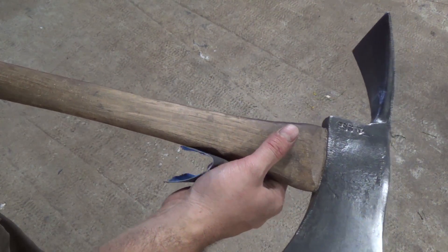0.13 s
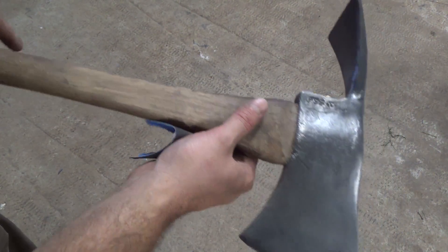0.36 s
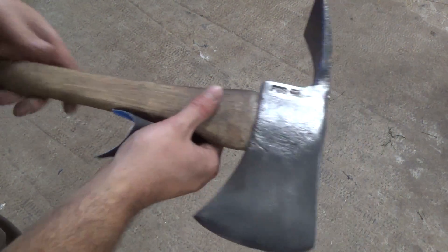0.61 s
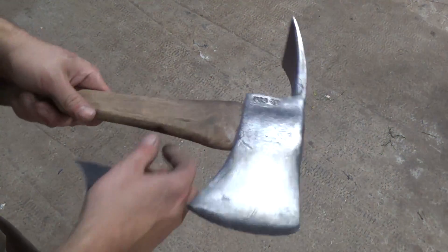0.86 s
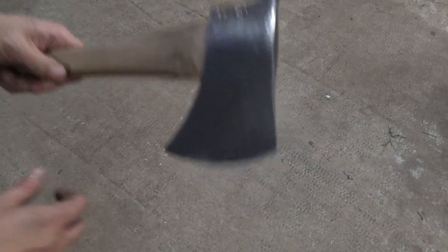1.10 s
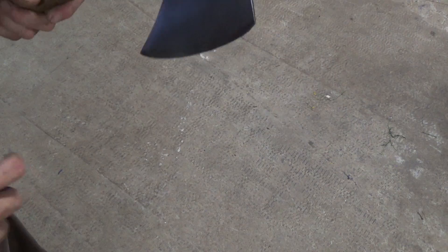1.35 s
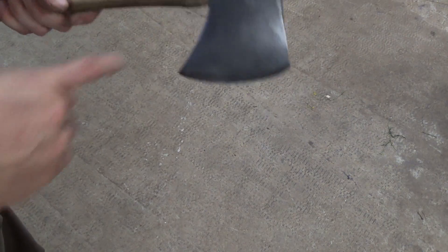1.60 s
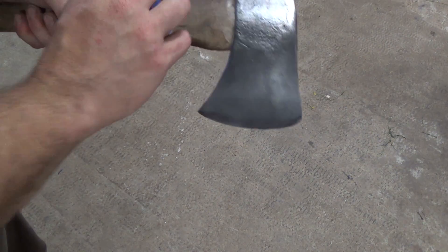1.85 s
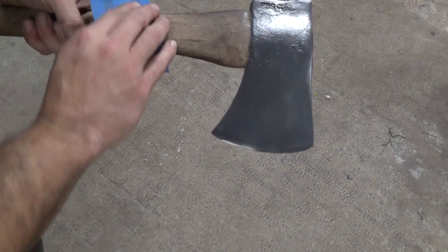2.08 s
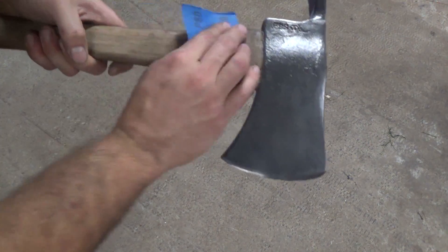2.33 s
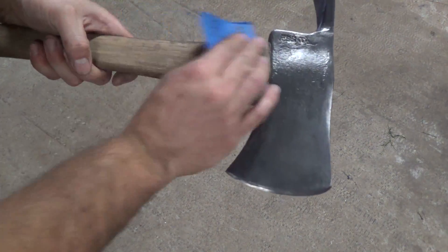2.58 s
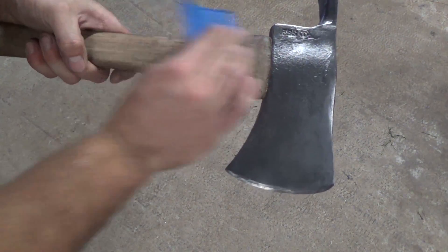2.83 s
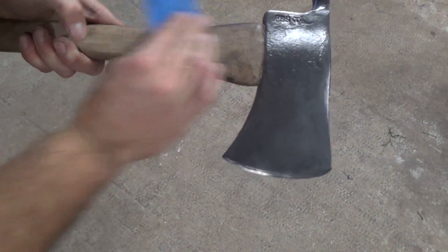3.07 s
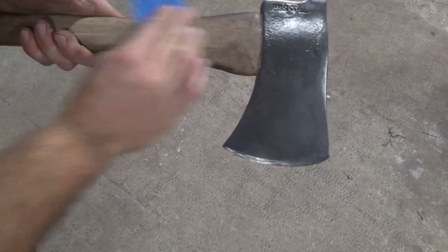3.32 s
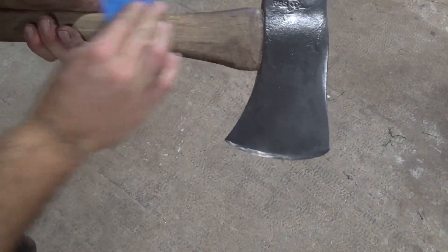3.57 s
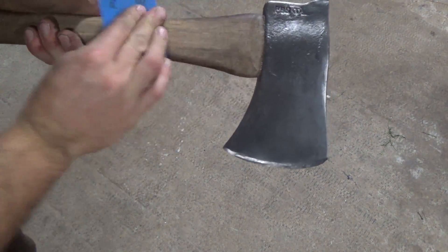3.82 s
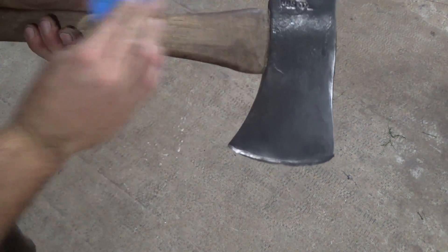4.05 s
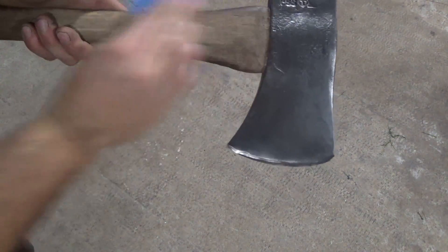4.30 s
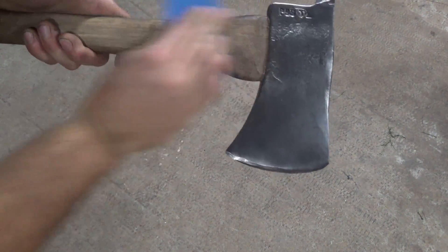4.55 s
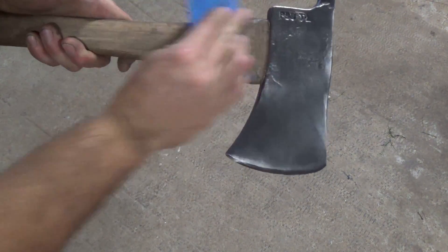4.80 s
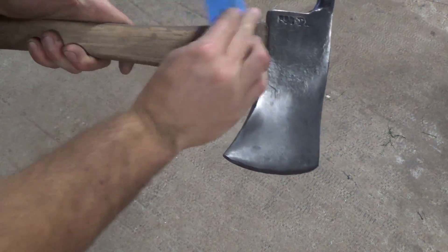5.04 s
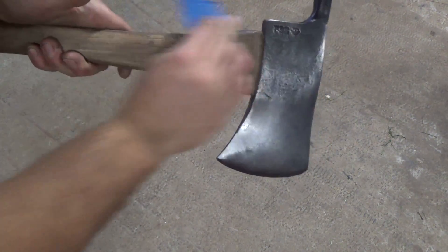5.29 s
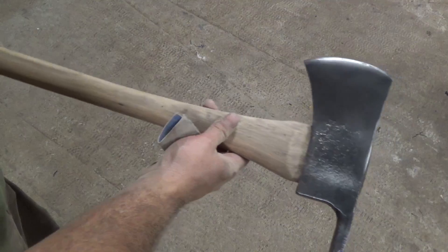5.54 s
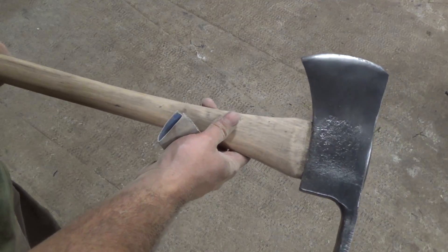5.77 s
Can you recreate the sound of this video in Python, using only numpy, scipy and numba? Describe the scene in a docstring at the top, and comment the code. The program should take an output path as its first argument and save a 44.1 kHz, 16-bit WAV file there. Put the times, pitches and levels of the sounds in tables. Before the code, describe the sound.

Close camera microphone in a hard-floored room. First two seconds are quiet: soft skin and paper rubbing, low wind-like buffeting, a little clatter of the tool, paper crackling. From then on sandpaper scrubs wood in brisk, even, gritty back-and-forth strokes, bright and dry with short room reflections. The sanding is abruptly cut off near the end; only quieter, smooth background air remains.

```python
"""Concrete room: a hand shifts a wooden tool handle and sandpaper, then sands the handle in quick strokes.
Dense grains of noise drive resonances of wood, handle, paper and hiss; stroke speed sets their loudness.
Slides, crackles and a knock on decaying modes come first; delay lines answer as the room.
Low noise and short eddies buffet the microphone; a camera whines and ticks as a sine and short blips.
The sound of sanding and room is cut off abruptly; a quieter hush of coloured noise is left."""
import sys
import numpy as np
from scipy import signal
from scipy.fft import rfft, irfft
from scipy.io import wavfile
from scipy.ndimage import uniform_filter1d
from numba import njit

SR = 44100
rng = np.random.default_rng(int(sys.argv[2]) if len(sys.argv) > 2 else 0)


def wav_out(sig):
    """Save sig, one row per channel (or a flat mono array), as 16-bit PCM at SR to the path in sys.argv[1]."""
    wavfile.write(sys.argv[1], SR, np.round(np.clip(np.atleast_2d(sig).T, -1, 1) * 32767).astype(np.int16))


def elevation(decibels):
    """Turn decibel levels (scalar or array-like) into linear amplitude ratios."""
    levels = np.asarray(decibels, float)
    return 10 ** (levels / 20)


N = 260190
T = np.arange(N) / SR
CUT_S = 5.543  # the sound of sanding and room is cut off
LEFT_RIGHT = np.array([[1], [-1]])  # signs of a side signal


def curve(table):
    """Columns of a table, joined by straight lines in time."""
    s, *columns = np.transpose(table)
    return [np.interp(T, s, c) for c in columns]


def unit(x):
    """Scale to rms 1."""
    return x / np.sqrt(np.mean(x ** 2))


def walk(rate_hz):
    """Random levels held 1 / rate_hz and slewed twice; rms 1."""
    k = int(SR / rate_hz)
    held = np.repeat(rng.standard_normal(N // k + 1), k)
    slewed = uniform_filter1d(uniform_filter1d(held, k), k)
    return unit(slewed[:N])


@njit
def svf(x, hz, width, sr):
    """State-variable band-pass with a moving centre, gain 1 there."""
    y, band, low = np.empty(len(x)), 0., 0.
    for i in range(len(x)):
        g, k = np.tan(np.pi * hz[i] / sr), width / hz[i]
        v = (band + g * (x[i] - low)) / (1 + g * (g + k))
        band, low, y[i] = 2 * v - band, low + 2 * g * v, k * v
    return y


def bandpass(x, hz, width_hz):
    """One band-pass at a fixed centre."""
    return svf(x, np.full(len(x), 1. * hz), 1. * width_hz, 1. * SR)


def add(out, s, sound):
    """Mix a short sound in at a time."""
    i = int(s * SR)
    out[i:i + len(sound)] += sound[:N - i]


def decay(size, t60_s):
    """Exponential decay by 60 dB in t60_s."""
    return np.exp(-np.log(1000) * T[:size] / t60_s)


def burst(hz, shape):
    """Band noise, as wide as its centre is high, under a short envelope."""
    noise = rng.standard_normal(len(shape))
    return shape * unit(bandpass(bandpass(noise, hz, hz), hz, hz))


def grit(spread_db):
    """Uneven sizes of the grains, one a sample; none is huge."""
    return elevation(spread_db * rng.exponential(size=N).clip(0, 6))


SWELL_DB = 1.4  # rms


def resonate(size, modes, drift, tune):
    """Each resonance is struck by its own grains of the shared size; it wanders and swells as the hand moves."""
    out = 0
    for hz, width_hz, db in modes:
        centre_hz = hz * tune * (1 + drift * walk(9))
        once = svf(size * rng.standard_normal(N), centre_hz, 1. * width_hz, 1. * SR)
        gain = elevation(db + SWELL_DB * walk(12))
        out = out + gain * svf(once, centre_hz, 1. * width_hz, 1. * SR) / np.sqrt(width_hz)
    return out


# Resonances of wood body, handle ring, paper ring and grit hiss.
# Each row: centre in Hz, width per filter pass in Hz, relative level in dB.
BODY_MODES = [(310, 89, -23), (650, 710, -8.5), (1216, 850, 1.5)]
HANDLE_MODES = [(1795, 730, -2), (2180, 580, 0.5), (2860, 1100, -5)]
PAPER_MODES = [(3500, 1010, -3.5), (3872, 780, 1.5), (4760, 1400, -0.5), (5553, 1130, -0.5)]
HISS_MODES = [(7400, 5200, -4.5), (10190, 4600, 0), (11670, 6100, -2.5), (14700, 3600, -13.5)]
# The cupped hand tunes the handle ring. Each row: time in seconds, factor on its Hz.
CUP = [(2.31, 1.23), (2.48, 0.81), (2.62, 1.01), (3.28, 1.013), (4.1, 1.056), (4.93, 1.01), (5.5, 0.99)]


def rasp(spread_db, drift, flicker_db):
    """Four families of resonances under the same grit, each with its own flicker."""
    size = grit(spread_db)
    tunes = (1, curve(CUP)[0], 1, 1)
    families = (BODY_MODES, HANDLE_MODES, PAPER_MODES, HISS_MODES)
    return [unit(resonate(size, modes, drift, tune)) * elevation(flicker_db * walk(40))
            for modes, tune in zip(families, tunes)]


# Strokes away and back in turn, with the grip's colour against the handle ring. Each row: start in seconds,
# slowed after seconds, wood body in dB, paper ring in dB, grit hiss in dB.
STROKES = [(2.236, 0.14, -10, 5, 1.5), (2.424, 0.093, -6.5, 5.0, 1), (2.574, 0.092, -11, 1.5, 8),
           (2.71, 0.092, -7, 2.5, 2.5), (2.843, 0.098, -11.2, 0.5, 2), (2.972, 0.097, -9.5, -1.9, 0.1),
           (3.11, 0.085, -8.5, 1.5, 3.5), (3.222, 0.11, -7.5, 2.5, 2.5), (3.367, 0.091, -5.5, 5, 5),
           (3.497, 0.097, -6.5, 4.8, 4), (3.635, 0.1, -7, 2, 3.5), (3.772, 0.095, -14, 3.5, 4),
           (3.909, 0.093, -7.5, 3.5, 5.5), (4.045, 0.093, -8.5, 4, 5.5), (4.184, 0.11, -8, 1.7, 2.6),
           (4.321, 0.099, -10.5, 3.5, 2), (4.462, 0.1, -9, -0.2, -0.3), (4.593, 0.1, -10, 3, 2.5),
           (4.737, 0.094, -7, 2.5, -1.2), (4.872, 0.098, -12, 3.5, 2.5), (5.012, 0.1, -5, 4.5, 3),
           (5.139, 0.11, -11.5, 2, 1), (5.29, 0.095, -8.5, -0.2, -1.7), (5.432, 0.096, -9.5, 2.3, 0.2)]
# Speed profile of each direction: jerk at the start in dB, rise in seconds, slowing in seconds,
# fade in seconds, drag before the turn in dB.
AWAY = (-5.5, .034, .018, .015, -15)
BACK = (-4.5, .02, .032, .024, -18)
# Slide of the grip along a stroke: change of wood body, of paper ring and of grit hiss, all in dB per second.
AWAY_SLIDE = (-19, 15, 52)
BACK_SLIDE = (-10, 9.6, 0)
# Effort of the arm. Each row: time in seconds, rasp at full speed in dB.
EFFORT = [(2.3, -15), (2.4, -14.5), (2.5, -15.8), (4.6, -16.0), (5.05, -17.5), (5.2, -16.5), (5.5, -16.5)]
FIRST_RISE_S, FIRST_JERK_DB = 0.15, -27  # the first stroke gathers speed slowly
JERK_S, SLOWED_DB, SETTLE_S, SETTLE_DB = .003, -5, .025, -2.5
GRIP_SHIFT_S = 0.0042


def strokes():
    """Speed of the paper as a gain, and the grip's colour: jerk, rise, hold, slowing, fade to a light drag."""
    speed, grip_db = np.zeros(N), np.zeros((3, N))
    ends = [row[0] for row in STROKES[1:]] + [N / SR]
    for k, ((s, length_s, *colour_db), end) in enumerate(zip(STROKES, ends)):
        jerk_db, rise_s, slowing_s, fade_s, drag_db = (AWAY, BACK)[k % 2]
        if k == 0:
            jerk_db, rise_s = FIRST_JERK_DB, FIRST_RISE_S
        now = slice(int(s * SR), int(end * SR))
        t = T[now] - s
        up = np.interp(t, [0, JERK_S, rise_s], elevation(np.array([drag_db, jerk_db, 0])))
        down_db = np.interp(t - length_s, [-slowing_s, -slowing_s / 3, 0, fade_s, fade_s + SETTLE_S],
                            [0, SLOWED_DB / 3, SLOWED_DB, drag_db, drag_db + SETTLE_DB])
        speed[now] = up * elevation(down_db)
        slide_db = np.outer((AWAY_SLIDE, BACK_SLIDE)[k % 2], t.clip(0, length_s) - length_s / 2)
        grip_db[:, now] = np.array(colour_db)[:, None] + slide_db
    speed = speed * elevation(curve(EFFORT)[0]) * (T < CUT_S)
    return speed, uniform_filter1d(grip_db, int(GRIP_SHIFT_S * SR))


# The paper snags and the rasp dips. Each row: middle in seconds, length in seconds, dip in dB.
SNAGS = [(2.426, 0.021, -5.5), (2.715, 0.018, -4.5), (2.977, 0.027, -5), (3.232, 0.021, -10.5),
         (4.187, .02, -3), (4.737, 0.0045, -5), (5.092, 0.023, -5.5), (5.15, 0.024, -9.5)]
# Paper bites the wood as a stroke turns. Each row: start in seconds, level in dB, centre in Hz,
# decay constant in seconds.
BITES = [(2.433, -17, 1370, 0.014), (2.709, -21.5, 905, 0.017), (2.97, -20, 810, 0.017),
         (3.226, -18.5, 1400, 0.019), (3.77, -15, 1160, 0.013), (4.046, -9.5, 1530, 0.0051),
         (4.321, -13.5, 1580, .01), (4.733, -23.5, 650, 0.0041), (4.871, -18, 1070, 0.016),
         (5.14, -20, 1520, 0.0052)]


def sanding():
    """Loudness follows the speed of the paper; the grip shares it among the resonances."""
    speed, (body_db, paper_db, hiss_db) = strokes()
    dips_db = sum(db * np.exp(-((T - s) / length_s * 2) ** 2) for s, length_s, db in SNAGS)
    speed = speed * elevation(dips_db)
    # slow paper loses its hiss first, then its ring
    slow = np.log10(speed / speed.max() + 0.027)
    paper_db, hiss_db = paper_db + 4 * slow, hiss_db + 7 * slow
    shares = elevation(np.array([body_db, 0 * T, paper_db, hiss_db]))
    shares = shares / np.sqrt(np.sum(shares ** 2, axis=0))
    shimmer = elevation(.8 * walk(120))
    families = rasp(spread_db=1.9, drift=.022, flicker_db=1.2)
    out = speed * shimmer * np.sum(shares * families, axis=0)
    for s, db, hz, decay_s in BITES:
        t = T[:4000] / decay_s
        add(out, s, elevation(db) * burst(hz, np.exp(-t) * (1 - np.exp(-t * 8))))
    return out


# Skin and paper slide over the handle. Each row: middle in seconds, length in seconds, level in dB,
# treble against it in dB.
SLIDES = [(0.233, 0.075, -53, -11), (0.294, 0.046, -57, -4), (0.487, 0.094, -52.5, -6),
          (0.745, 0.27, -49.5, -1), (.86, .12, -52, -4.5), (.96, .12, -53, -7), (1.1, 0.32, -60, -2),
          (1.338, 0.31, -50.5, -5), (1.47, 0.14, -50.5, -13), (1.57, 0.25, -48.5, -13),
          (1.716, 0.23, -57, -17), (1.85, .12, -53, -2), (2.038, .12, -52, 0), (2.127, 0.16, -50, -1)]


def slides():
    """Each slide swells and dies away; the gain of its body and of its treble."""
    low, high = 0, 0
    for s, length_s, db, treble_db in SLIDES:
        swell = elevation(db) * np.cos(np.pi * ((T - s) / length_s).clip(-.5, .5)) ** 2
        low = low + swell
        high = high + swell * elevation(treble_db)
    return low, high


def ring(hz, t60_s):
    """One decaying mode."""
    size = SR // 2
    return np.sin(2 * np.pi * hz * T[:size]) * decay(size, t60_s)


# Stiff paper crackles, grains snap off, a hand scuffs. Each row: start in seconds, level in dB,
# centre in Hz, t60 in seconds.
CRACKLES = [(0.293, -44.5, 3500, .03), (.46, -42, 2190, .05), (.491, -44, 2100, 0.061),
            (1.727, -38, 1510, .02), (1.825, -33, 3800, 0.02), (1.833, -32, 8000, 0.013),
            (1.847, -34.5, 2480, 0.022), (1.947, -36.5, 980, 0.036), (2.041, -39.5, 800, 0.17),
            (2.106, -37, 2280, 0.11), (2.236, -30, 4080, 0.012), (2.7125, -11, 10500, 0.0049),
            (5.0905, -9, 5500, .008), (5.101, -16, 4200, .02), (5.1405, -11.5, 4500, 0.0094),
            (5.78, -47.5, 377, 0.19)]
# Contacts of the knock on the tool. Each row: start in seconds, relative level in dB.
KNOCKS = [(1.526, -25), (1.531, -38), (1.544, -25), (1.556, -32)]
# Modes of the tool. Each row: frequency in Hz, relative level in dB, t60 in seconds.
TOOL_MODES = [(504, 2.5, 0.086), (584, -1, 0.09), (1026, 2, 0.14), (1330, -5, 0.04), (1686, -9, .1),
              (2300, -14, 0.092), (2720, -15, .2), (3020, -16, 0.33), (3580, -15, .25), (3860, -8, .2),
              (4199, -9, .2), (4500, -11, .18), (4850, -18, .12)]


def handling():
    """Soft sliding, paper crackles and a rattling knock on the tool."""
    low, high = slides()
    body, handle, paper, hiss = rasp(spread_db=2.0, drift=.04, flicker_db=1.5)
    out = low * (0.45 * body + 0.59 * handle + 0.65 * paper) + high * hiss
    for s, db, hz, t60_s in CRACKLES:
        add(out, s, elevation(db) * burst(hz, decay(6000, t60_s)))
    # a thin scrape on one pitch as the hand slides
    scrape = unit(bandpass(rng.standard_normal(7000), 3800, 150))
    add(out, .84, elevation(-56) * np.hanning(7000) * scrape)
    # the wood answers the knock with a dull clatter
    knock_s = KNOCKS[0][0]
    add(out, knock_s, elevation(-34) * burst(700, np.exp(-T[:6000] / .035)))
    add(out, knock_s, elevation(-46) * burst(2300, np.exp(-T[:6000] / 0.055)))
    # every contact strikes the modes with other signs
    signs = rng.choice([-1, 1], (len(KNOCKS), len(TOOL_MODES)))
    for (s, db), row in zip(KNOCKS, signs):
        modes = sum(sign * elevation(mode_db) * ring(hz, t60_s) for sign, (hz, mode_db, t60_s) in zip(row, TOOL_MODES))
        add(out, s, elevation(db) * modes / 3)
    return out


# Draught on the microphone. Each row: time in seconds, level in dB.
WIND = [(0, -50), (.4, -58), (.66, -49), (1.0, -40.5), (1.2, -45.5), (1.34, -38), (1.44, -49), (1.78, -45),
        (1.94, -53.5), (2.3, -52.5), (3.9, -62), (5.36, -55), (5.56, -62.5), (5.9, -63)]
# Single eddies that thump the microphone. Each row: middle in seconds, relative level in dB, frequency in Hz.
BUFFETS = [(.04, -41, 86.5), (0.139, -43, 97), (.733, -36.5, 83.7), (.83, -30.5, 104), (0.919, -33, 125),
           (.968, -30, 102), (1.028, -33, 99), (1.061, -28, 117), (1.277, -36, 109.4), (1.301, -23, 98),
           (1.334, -27.5, 140), (1.358, -23, 145), (1.382, -25, 127), (1.683, -35, 86), (1.719, -34.5, 106),
           (1.859, -33.5, 109), (2.211, -38, 70), (2.278, -37, 74), (2.586, -33.5, 82)]


def wind():
    """A lumpy rumble and single eddies of a cycle or two, mostly shared by the two ports."""
    rumbles = []
    for _ in range(2):
        centre_hz = 80 * (1 + 0.17 * walk(22)).clip(.4, 2)
        rumbles.append(svf(rng.standard_normal(N), centre_hz, 97.0, 1. * SR))
    mid, side = (elevation(curve(WIND)[0] + 3.1 * walk(23.95)) * unit(bandpass(r, 90, 260)) for r in rumbles)
    thumps = np.zeros((2, N))
    for (s, db, hz), (turn, lean) in zip(BUFFETS, rng.random((len(BUFFETS), 2))):
        size = int(2.2 * SR / hz)
        eddy = elevation(db) * np.hanning(size) * np.sin(2 * np.pi * (hz * T[:size] + turn))
        start_s = s - size / SR / 2
        add(thumps[0], start_s, eddy * elevation(6.8 * lean))
        add(thumps[1], start_s, eddy * elevation(3.5 - 3.8 * lean))
    return mid + 0.36 * side * LEFT_RIGHT + thumps


WHINE_HZ, WHINE_DB = 15734.3, -59
TICK_RATE_HZ, TICK_DB = 29.97, -57
# Runs of ticks. Each row: first in seconds, end in seconds.
TICK_RUNS = [(.030, 4.6), (5.551, 5.89)]


def camera():
    """A slightly unsteady line whine and a faint blip once a frame."""
    gain = np.sqrt(2) * elevation(WHINE_DB + 1.1 * walk(24.8))
    out = gain * np.sin(2 * np.pi * WHINE_HZ * T + .4 * walk(30))
    blip = np.hanning(260) * np.sin(2 * np.pi * 3180 * T[:260])
    for first_s, end_s in TICK_RUNS:
        for s in np.arange(first_s, end_s, 1 / TICK_RATE_HZ):
            add(out, s - .003, elevation(TICK_DB) * blip)  # .003 s centres the blip
    return out


# Colour of the air. Each row: frequency in Hz, relative level in dB.
HUSH_COLOUR = [(80, -48), (200, -2.5), (660, 0), (1200, -3), (2600, -10), (4500, -15.5), (8000, -19),
               (15900, -19.5)]
# Level of the air. Each row: time in seconds, level in dB.
HUSH_LEVEL = [(0, -57), (1.2, -55), (5.54, -50), (5.56, -60), (5.9, -61)]


def hush():
    """The air of the room: smooth coloured noise, nearly alike left and right, more so in the treble."""
    hz = np.arange(N // 2 + 1) * SR / N + 1
    colour_hz, colour_db = np.transpose(HUSH_COLOUR)
    colour = elevation(np.interp(np.log(hz), np.log(colour_hz), colour_db))
    apart = np.array([1 + 0 * hz, 0.19 / (1 + (hz / 10000) ** 8)])
    spectrum = rfft(rng.standard_normal((2, N))) * colour * apart
    mid, side = np.sqrt(2) * unit(irfft(spectrum, N))
    return elevation(curve(HUSH_LEVEL)[0] + 0.47 * walk(8.2)) * (mid + side * LEFT_RIGHT)


@njit
def walls(x, lags, gain, damp):
    """Eight delay lines that feed each other, duller on every round."""
    line, soft, out = np.zeros((8, 4096)), np.zeros(8), np.zeros((2, len(x)))
    for i in range(len(x)):
        total = 0.
        for k in range(8):
            soft[k] += (1 - damp) * (gain[k] * line[k, (i - lags[k]) & 4095] - soft[k])
            total += soft[k]
            out[k % 2, i] += soft[k]
        for k in range(8):
            line[k, i & 4095] = x[i] + soft[k] - total / 4
    return out


ROOM_DB, ROOM_T60_S, ROOM_DAMP = -20, .6, .25  # t60 before damping


def scene():
    """The work sits left of centre in the lower mids; a floor echo differs between the close ports in two bands."""
    near = sanding() + handling()
    lags = np.array([499, 677, 811, 1013, 1259, 1493, 1777, 2081])  # samples
    lag_gains = elevation(-60 * lags / SR / ROOM_T60_S)
    # the tiny offset keeps the delay lines from total silence
    room, far_room = (T < CUT_S) * walls(near + 1e-18, lags, lag_gains, ROOM_DAMP)
    echo = np.roll(near, 110) + elevation(-9) * far_room
    bands = ((near, 1800, 7000, -22), (echo, 2200, 2000, -23), (echo, 7000, 4000, -17))
    side = sum(elevation(db) * bandpass(bandpass(x, hz, width_hz), hz, width_hz) for x, hz, width_hz, db in bands)
    work = near + elevation(ROOM_DB) * room + side * LEFT_RIGHT
    # a ramp of a few ms smooths the cut of work and room
    gate = np.clip(np.abs(CUT_S - T - .003) / 0.0047, 0, 1)
    return work * gate + wind() + hush() + camera()


def low_pass(x):
    """Removes everything above the highest recorded frequency."""
    return signal.sosfilt(signal.butter(12, 17110, fs=SR, output="sos"), x)


TOP_HZ = 15900


def record(dry):
    """The microphone rolls off the deepest bass and the top and rounds the loudest peaks."""
    bass_cut = signal.butter(2, 30, "high", fs=SR, output="sos")
    top_cut = signal.ellip(10, .2, 60, TOP_HZ, fs=SR, output="sos")
    sound = signal.sosfilt(top_cut, signal.sosfilt(bass_cut, dry))
    return low_pass(np.tanh(1.295 * sound) / 1.274)


dry = scene()
out = record(dry)
wav_out(out)
```